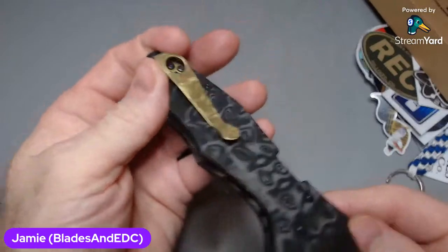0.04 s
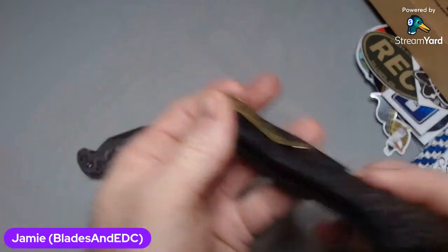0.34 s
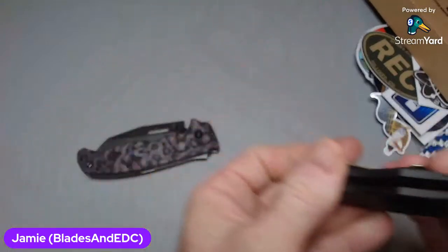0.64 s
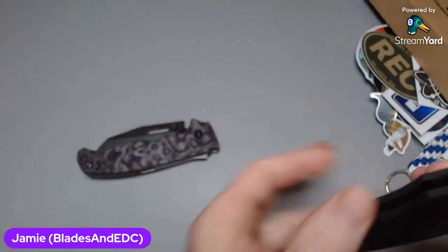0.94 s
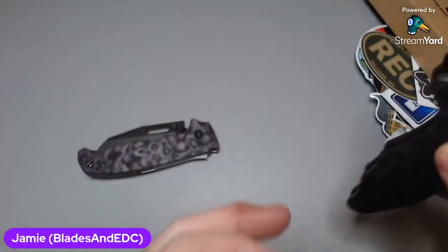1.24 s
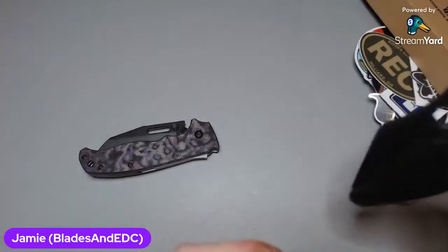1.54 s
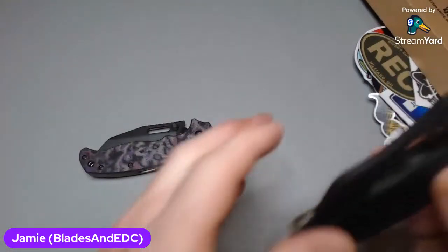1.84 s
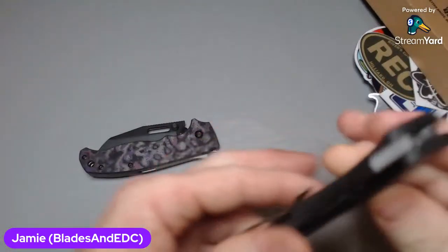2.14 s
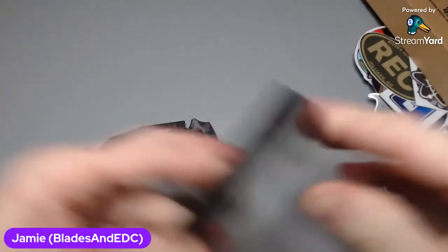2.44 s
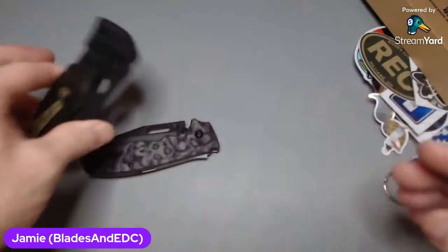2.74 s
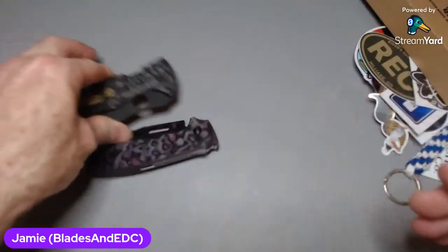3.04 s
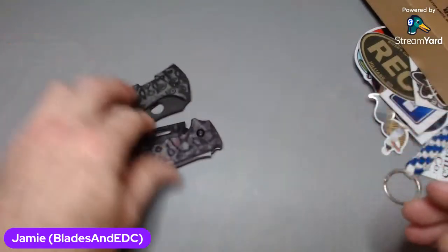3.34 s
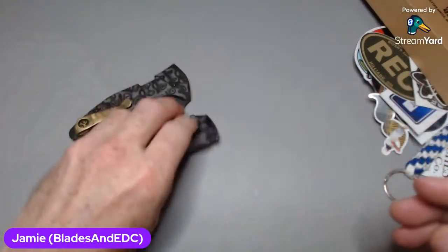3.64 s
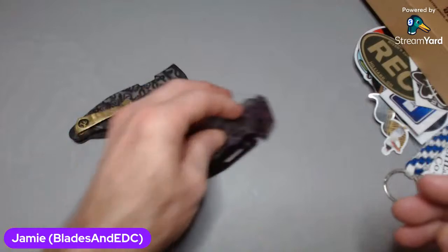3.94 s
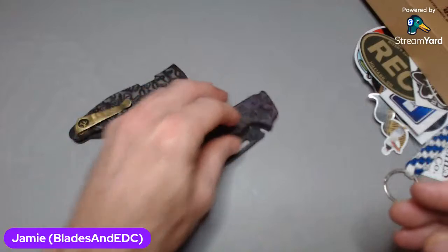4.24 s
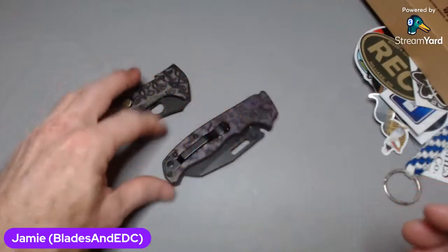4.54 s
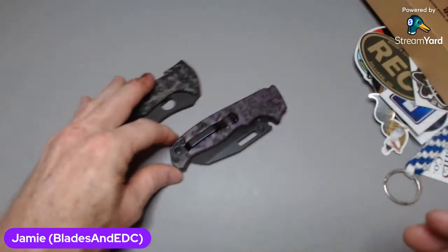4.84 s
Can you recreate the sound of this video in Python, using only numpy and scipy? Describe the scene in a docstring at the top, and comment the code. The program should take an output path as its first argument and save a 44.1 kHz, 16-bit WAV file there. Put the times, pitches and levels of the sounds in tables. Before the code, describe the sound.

Folding knives are handled close by, with a sharp snap, a metallic clatter on a desk, then smaller clicks and knocks.

```python
"""Two folding knives are handled over a desk in a small room, close to a microphone on the desk.
First the big knife clicks as it is folded; a little after three seconds it clatters down.
Then the small one is nudged, turned over and laid beside it, and the big one gets a last touch.
All along, fingers and handles slide and arms bump the desk softly, over the room's faint rumble."""
import sys
import numpy as np
from scipy import signal
from scipy.fft import rfft, irfft
from scipy.io import wavfile

SR = 44100
rng = np.random.default_rng(int(sys.argv[2]) if len(sys.argv) > 2 else 0)


def dump_mix(stems):
    """Bounce the given channels to the path in sys.argv[1] as a 16-bit WAV at rate SR."""
    frames = np.atleast_2d(stems).T  # one column per channel
    limited = np.clip(frames, -1, 1)  # hard clip at full scale
    pcm = np.round(limited * 32767).astype(np.int16)
    wavfile.write(sys.argv[1], SR, pcm)


N = 224336
T = np.arange(int(.4 * SR)) / SR  # time within one short sound, in seconds


def big_knife():
    """The big knife grazes the desk, lands on one end, slaps flat, rocks, and is touched once more."""
    # each contact: t/s, level/dB, low edge/Hz, high edge/Hz, favoured f/Hz, ring/dB, scuff length/s
    contacts = [(3.1955, -28, 2480, 9000, 5550, -1.5, 0.0017),
                (3.199, -20, 2950, 11000, 5600, -12, 0.00079),
                (3.2033, -12.5, 4300, 7300, 6240, -4.5, 0.00064),
                (3.210, -8, 1400, 12200, 4030, -1, 0.00034),
                (3.2125, -11, 2350, 16400, 6540, -12.5, 0.0017),
                (3.2155, -14, 2930, 16000, 4400, -11.5, 0.00059),
                (3.2255, -22, 3435, 16000, 12650, -9, .002), (3.2325, -17, 2890, 11640, 4240, -7, 0.0019),
                (3.251, -27, 1404, 7710, 2578, -5.5, 0.0036), (4.958, -42, 3070, 12200, 6100, -17, 0.017)]
    # the tones its metal rings with: f/Hz, level/dB, t60/s (the time to die away by 60 dB)
    tones = [(1350, -14, .07), (2230, -9, .06), (2966, -12, .09), (3909, -3, .07), (4077, -6, .16),
             (4190, -8, .17), (4301, -6, .16), (4440, -9, .17), (4758, -5, .08), (4934, -5, .07),
             (5563, -4, .06), (5963, -1, .07), (6264, 2, .075), (6618, 3, .07), (6983, -4, .06),
             (8247, -6, .07), (10550, -7, .06), (12910, -9, .07), (14070, -6, .06)]
    return knife_clicks(contacts, tones, buzz_db=5.5, buzz_t60=.08, band_db=-5.5, band_q=5.6)


def folding(folded_s=1.25):
    """The big knife's lock drags, snaps and rebounds; the knife rings differently once the blade is in."""
    # each snap: t/s, level/dB, low edge/Hz, high edge/Hz, favoured f/Hz, ring/dB, scuff length/s
    snaps = [(0.383, -41, 2660, 10700, 5200, -24, 0.014), (1.1686, -33.5, 700, 15900, 4750, 2.5, 0.0026),
             (1.3453, -25.5, 3500, 16300, 4254, 4, 0.0018), (1.5187, -9.5, 2050, 12440, 2310, -7, 0.0004),
             (1.654, -48.5, 3630, 14000, 6400, -7, 0.00055), (1.6945, -28.5, 1710, 8700, 2010, -7, 0.0088)]
    # tones of the lock, the open knife and the closed knife: f/Hz, level/dB, t60/s
    lock = [(9135, -1, .058), (11500, -9, .07), (12740, -3, .04)]
    blade_out = [(1152, -6, .07), (1900, -7, .05), (2875, -13, .09), (4624, 4, .033), (4790, 3, .025),
                 (15090, 3, .023)]
    blade_in = [(2030, -12, .06), (2350, -11, .06), (3553, -1, .032), (4344, 4, .027), (6051, -4, .05),
                (6400, -9, .07), (8830, -3, .03), (14990, -9, .03)]
    out = np.zeros(N)
    for snap in snaps:
        s, db, low_hz, high_hz, main_hz, ring_db, _ = snap
        drag = (s - .0042, db - 19, low_hz, 6500, main_hz, -7, .0012)  # softer and duller
        rebound = (s + .0076, db - 15.5, low_hz, high_hz, main_hz, ring_db + 3, .0051)  # rings more freely
        tones = lock + (blade_out if s < folded_s else blade_in)
        out += knife_clicks([drag, snap, rebound], tones, buzz_db=-8, buzz_t60=.08, band_db=2.5, band_q=5)
    return out


def small_knife():
    """The small knife rattles against the big one, is turned over and laid down."""
    # each contact: t/s, level/dB, low edge/Hz, high edge/Hz, favoured f/Hz, ring/dB, scuff length/s
    contacts = [(3.625, -45.5, 2050, 4940, 4000, -10, 0.0029),
                (3.6303, -32.5, 1984, 7640, 3830, 0.5, 0.0018), (3.6395, -37, 2480, 5150, 3750, -10, .0015),
                (3.646, -35, 2100, 5790, 3670, 4, 0.0025), (3.653, -40, 2123, 5355, 3510, 4, 0.0022),
                (3.664, -43.5, 2690, 3980, 3410, -1, 0.002), (3.677, -47.5, 2327, 4070, 3650, -16, 0.0049),
                (4.010, -46, 1235, 9200, 4714, -10, 0.015), (4.0335, -44, 1412, 8790, 4360, -2.5, 0.0021),
                (4.0555, -48, 1990, 6980, 3470, -12, 0.0078), (4.264, -46, 1522, 11930, 3080, -7, 0.0024),
                (4.269, -39, 1232, 7960, 2470, -10, 0.0014), (4.277, -43.5, 1190, 5960, 3000, 5, 0.0033),
                (4.3013, -49, 1388, 7960, 3820, -22, 0.0018), (4.308, -49, 1290, 6950, 3114, -4, 0.0037),
                (4.340, -56, 1312, 6090, 3280, -10, .002)]
    # the tones its metal rings with: f/Hz, level/dB, t60/s
    tones = [(2226, -4, .06), (2430, -4, .055), (3120, -8, .06), (3500, -3, .045), (3930, -1, .04),
             (4290, -11, .06), (6100, -9, .06), (9400, -16, .05)]
    # how its handle strengthens or weakens each pitch: f/Hz, level/dB
    handle = [(1200, 10.5), (1800, 3.5), (2350, 3), (2800, 0.5), (3600, 1), (4700, 0.5), (6100, 1.5),
              (7600, -4.5), (9400, 1), (11000, 0.5), (14000, 6.5)]
    clicks = knife_clicks(contacts, tones, buzz_db=0, buzz_t60=.07, band_db=4.5, band_q=9.3)
    return colour(clicks, handle)


def knife_clicks(contacts, tones, buzz_db, buzz_t60, band_db, band_q):
    """Each contact is a gritty scuff, a brief buzz of the knife's parts and the ring of its metal."""
    out = np.zeros(N)
    for s, db, low_hz, high_hz, main_hz, ring_db, scuff_s in contacts:
        grit, buzz, grain_size = rng.standard_normal((3, len(T)))
        scuff = unit(grit * undb(2.5 * grain_size) * np.exp(-T / scuff_s))
        parts = undb(buzz_db) * unit(buzz * fade(buzz_t60))
        metal = unit(ring(tones, scatter_db=2.2, detune=.00014, blur_hz=25))
        build_up = 1 - np.exp(-2 * T / scuff_s)  # the ring grows while the scuff dies
        click = scuff + undb(ring_db) * (metal + parts) * build_up
        click = edge(click, low_hz, "high", order=3)
        click = edge(click, high_hz, "low")
        add(out, s, undb(db) * unit(favour(click, main_hz, band_db, band_q)))
    return out


def desk_knocks(spread_s=.002, cutoff_s=.085):
    """A blow spreads through the desk top and rings it briefly; the ring is then cut short."""
    # each blow: t/s, level/dB, high edge/Hz (harder is brighter), t60/s of extra damping
    knocks = [(1.168, -41.5, 1180, 0.4), (1.52, -47, 812, 0.049), (3.195, -23, 1420, 0.14),
              (3.2029, -13, 1430, 0.069), (3.2083, -8, 1120, 0.14), (3.2118, -7.5, 520, 0.17),
              (3.224, -14, 815, 0.11), (3.231, -18.5, 500, 0.05), (3.245, -22.5, 252, 0.18),
              (3.256, -19.5, 168.8, 0.14), (3.278, -22, 185, 0.086), (3.298, -24, 113, 0.033),
              (3.648, -35, 486, 0.6), (4.0082, -23, 580, 0.19), (4.015, -23.5, 328, 0.21),
              (4.029, -17.5, 252, 0.5), (4.267, -21, 860, 0.5), (4.273, -19.5, 419, 0.26),
              (4.299, -22, 220.3, 0.14), (4.336, -30.5, 191.5, 0.19)]
    # the clear tones of the desk top: f/Hz, level/dB, t60/s
    tones = [(83, -12.5, .17), (127, 2, .23), (232, 0, .25), (275, -2, .11), (335, 2, .09), (361, 8, .12),
             (412, 6, .1), (465, 4, .09), (525, 0, .09), (592, -8, .1), (635, 0, .19), (745, -2, .08),
             (785, 0, .07), (815, 1, .08), (977, -13, .11), (1195, -15, .11)]
    # where its many weak, crowded tones gather: f/Hz, level/dB
    crowd_shape = [(40, -18), (120, 0), (290, -1), (390, 6), (480, 1), (570, -4), (630, -5), (690, -17),
                   (790, 1), (850, -3), (940, -14), (1200, -16), (1600, -30), (4000, -65)]
    out = np.zeros(N)
    swell_and_cutoff = (1 - np.exp(-T / spread_s)) * np.exp(-(T / cutoff_s) ** 2)
    for s, db, high_hz, damp_t60 in knocks:
        crowd = colour(rng.standard_normal(len(T)), crowd_shape) * fade(t60=.1)
        clear = ring(tones, scatter_db=3, detune=.003, blur_hz=1)
        blow = (unit(clear) + undb(-5) * unit(crowd)) * fade(damp_t60) * swell_and_cutoff
        blow = edge(blow, high_hz, "low", order=4)
        blow = favour(blow, .68 * high_hz, band_db=-5, band_q=1.1)
        add(out, s, undb(db) * unit(blow))
    return out


def arm_bumps(wobble=.094, rub_db=-13):
    """Soft pushes of hands and arms sway the desk and microphone stand, with a dull rub of skin."""
    # the firmest bumps: t/s of the peak, level/dB, f/Hz, swell time/s
    bumps = [(0.022, -38, 67.65, 0.035), (0.17, -42, 107.1, 0.018), (0.308, -46, 100.1, 0.018),
             (.478, -46.5, 99.3, 0.0093), (0.517, -43.5, 108.7, 0.029), (0.599, -39, 76.4, 0.017),
             (0.891, -34.5, 79.9, 0.023), (1.019, -33.5, 84.6, 0.022), (1.092, -34.5, 85.05, 0.0069),
             (1.156, -29.5, 66.6, 0.015), (1.51, -37, 89, 0.013), (1.653, -34.5, 107.1, 0.028),
             (1.84, -40.5, 114.7, 0.0069), (1.889, -35.5, 81.1, 0.019), (2.032, -42.5, 89.7, 0.013),
             (2.133, -42.5, 79.2, .014), (2.306, -40.5, 151.4, 0.011), (2.861, -38.5, 115.6, 0.011),
             (2.934, -32, 75.7, 0.012), (4.221, -42.5, 86.4, 0.04), (4.63, -33.5, 89.3, 0.016),
             (4.758, -40, 170.9, 0.0083), (4.793, -34, 136.8, 0.013), (4.912, -30.5, 79.5, 0.013)]
    out = np.zeros(N)
    t = T - T[-1] / 2  # zero at the peak
    for s, db, hz, swell_s in bumps + fidgets():
        drift, rub = rng.standard_normal((2, len(T)))
        drift = edge(drift, 23, "low")
        pitch_hz = hz * (1 + wobble * drift / drift.std())
        sway = np.cos(2 * np.pi * np.cumsum(pitch_hz) / SR)
        rub = edge(edge(rub, 190, "low", order=4), 90, "high")
        swell = 1 / np.cosh(1.1 * t / np.where(t < 0, swell_s, .68 * swell_s))  # falls faster than it rises
        add(out, s + t[0], undb(db) * swell * (sway + undb(rub_db) * rub / rub.std()))
    return out


def fidgets(per_second=7, db=-46.5, hz=66.25, swell_s=.018):
    """List slight extra bumps at loose intervals, each with its own strength and pitch."""
    chance = rng.standard_normal((int(per_second * N / SR), 3))
    return [((k + .5 + late / 4) / per_second, db + 2 * louder, hz * 2 ** (.35 * higher), swell_s)
            for k, (late, louder, higher) in enumerate(chance)]


def finger_slides(grain_db=4, waver_db=1.5, steepness=1.1):
    """Skin and handles slide in countless tiny slips: a hiss that swells, wavers and fades."""
    # each stroke: t/s of the peak, level/dB, swell time/s, fade time/s, centre f/Hz, width/octaves
    strokes = [(.131, -73, 0.0092, 0.011, 5700, 0.11), (.177, -68, 0.0069, 0.006, 11100, 0.26),
               (.303, -70, 0.0017, 0.014, 7400, 1), (0.393, -59, 0.011, 0.035, 5370, 1),
               (.472, -60, .013, 0.011, 5500, 0.49), (0.553, -54, 0.01, 0.0095, 3940, 0.21),
               (.585, -69, .014, 0.063, 5400, 1), (1.248, -68, 0.098, 0.022, 2730, 0.006),
               (1.488, -60.5, 0.015, 0.016, 6106, 0.013), (1.492, -61.5, 0.025, 0.017, 11000, 0.66),
               (1.495, -63.5, 0.017, 0.018, 4200, 0.059), (1.576, -54, 0.023, 0.014, 6710, 0.44),
               (1.867, -71.5, 0.0025, 0.011, 9240, 1), (1.934, -79.5, 0.015, 0.02, 3670, 0.014),
               (2.091, -81.5, 0.0076, 0.0094, 4430, 0.011), (2.329, -65, 0.0065, 0.0075, 9590, 0.18),
               (2.345, -69, 0.015, 0.016, 5700, 0.039), (2.36, -55.5, 0.006, 0.028, 9604, 0.043),
               (2.396, -63.5, 0.021, 0.017, 3600, 0.48), (3.109, -70.5, 0.0078, 0.036, 4614, 0.24),
               (3.589, -66.5, .014, 0.014, 4004, 0.54), (3.83, -66, 0.013, 0.015, 4165, 0.67),
               (3.833, -57, .012, 0.013, 2804, 0.03), (4.095, -68.5, .015, 0.027, 4500, 0.94),
               (4.67, -68.5, 0.017, 0.025, 3275, 0.32), (4.765, -65, 0.024, 0.032, 7190, .35),
               (4.833, -58.5, 0.016, 0.036, 5220, 0.97), (4.934, -58, .028, 0.03, 5770, 0.91)]
    out = np.zeros(N)
    t = T - T[-1] / 2  # zero at the peak
    octave = np.log2(np.maximum(np.fft.rfftfreq(len(T), 1 / SR), 1))
    for s, db, swell_s, fade_s, hz, width in strokes:
        slips, grain_size, pressure = rng.standard_normal((3, len(T)))
        # each grip colours the hiss in its own way
        grip = np.column_stack([np.geomspace(2000, 16000, 60), 3 * rng.standard_normal(60)])
        hiss = colour(slips * undb(grain_db * grain_size), grip)
        hiss = edge(edge(hiss, 2600, "high"), 14500, "low", order=1)
        band = 1 / (1 + np.abs((octave - np.log2(hz)) / width) ** steepness)
        hiss = irfft(rfft(hiss) * band, len(T))
        pressure = edge(pressure, 48, "low")
        gain = undb(db + waver_db * pressure / pressure.std())
        swell = 1 / np.cosh(t / np.where(t < 0, swell_s, fade_s))
        add(out, s + t[0], gain * swell * hiss / hiss.std())
    return out


def room(x, echo_db, treble_hz=6500, build_s=.025):
    """Near walls and shelves add a short echo whose treble dies first."""
    low, high = rng.standard_normal((2, len(T)))
    low = edge(low, treble_hz, "low") * fade(t60=.19)
    high = edge(high, treble_hz, "high") * fade(t60=.15)
    tail = (low + high) * (1 - np.exp(-(T / build_s) ** 2))
    return x + undb(echo_db) * signal.fftconvolve(x, tail / np.linalg.norm(tail))[:N]


def room_air():
    """The steady low rumble and faint hiss of the room."""
    # the noise of the quiet room: f/Hz, level/dB in each 1 Hz band
    noise_shape = [(30, -81.8), (70, -82.0), (130, -88.9), (220, -97.6), (350, -104.1), (650, -107.6),
                   (1200, -113.8), (1800, -114.4), (2350, -115), (2750, -111), (3200, -117), (3800, -118),
                   (5000, -125.2), (8000, -129), (9500, -127.5), (14000, -130.5)]
    white = rng.standard_normal(N) * np.sqrt(SR / 2)  # 0 dB in each 1 Hz band
    return edge(colour(white, noise_shape), 38, "high")


def ring(tones, scatter_db, detune, blur_hz):
    """Fading tones; the place of contact changes each a little, and shifting support blurs its pitch."""
    out = np.zeros(len(T))
    for hz, db, t60 in tones:
        louder, higher = rng.standard_normal(2)
        wander = np.cumsum(rng.standard_normal(len(T))) * np.sqrt(2 * np.pi * blur_hz / SR)
        phase = 2 * np.pi * hz * (1 + detune * higher) * T + wander
        out += undb(db + scatter_db * louder) * fade(t60) * np.sin(phase)
    return out


def favour(x, hz, band_db, band_q):
    """The place of contact favours one band: add a copy of it at band_db. A higher band_q is narrower."""
    b, a = signal.iirpeak(hz, band_q, fs=SR)
    return x + undb(band_db) * signal.lfilter(b, a, x)


def colour(x, points):
    """Make each pitch in x louder or softer along a curve of (f/Hz, level/dB) points."""
    hz, db = np.transpose(points)
    f = np.maximum(np.fft.rfftfreq(len(x), 1 / SR), 1)
    gain = undb(np.interp(np.log(f), np.log(hz), db))
    return irfft(rfft(x) * gain, len(x))


def edge(x, hz, kind, order=2):
    """Keep what lies below ("low") or above ("high") hz; a higher order cuts more steeply."""
    return signal.sosfilt(signal.butter(order, hz, kind, fs=SR, output="sos"), x)


def fade(t60):
    """A fade that falls by 60 dB every t60 seconds."""
    return undb(-60 * T / t60)


def undb(db):
    """Turn decibels into a factor to multiply by."""
    return 10 ** (np.asarray(db) / 20)


def unit(x):
    """Scale a short sound to the energy of one millisecond at full level."""
    return x / np.sqrt(np.sum(x ** 2) / (SR / 1000) + 1e-18)


def add(out, s, x):
    """Mix x into out, starting at s seconds."""
    start = int(round(s * SR))
    first, last = max(start, 0), min(start + len(x), N)
    out[first:last] += x[first - start:last - start]


def scene():
    """Knives, hands and desk in the room, as one channel."""
    # how the hollow handle colours every snap and stroke: f/Hz, level/dB
    handle = [(800, -5.5), (1200, 6), (1600, -7.5), (2150, 0.5), (2900, -9.5), (4200, -1), (5200, -2),
              (6300, 1.5), (7300, -1), (8100, -3.5), (9150, 5), (10200, -2.5), (13000, 1.5), (15000, -0.5)]
    clatter = room(big_knife(), echo_db=-19.5) + room(small_knife(), echo_db=-20)
    in_hand = room(colour(folding() + finger_slides(), handle), echo_db=-25)
    # the stand carries the thuds straight to the microphone, all but their deepest part
    thuds = edge(desk_knocks() + arm_bumps(), 42, "high", order=3)
    return (clatter + in_hand + room(thuds, echo_db=-12.5) + room_air())[None]


def record(dry, top_hz=15800):
    """Cut the highest treble away steeply."""
    return signal.sosfilt(signal.ellip(8, .2, 70, top_hz, fs=SR, output="sos"), dry)


dry = scene()
out = record(dry)
dump_mix(out)
```